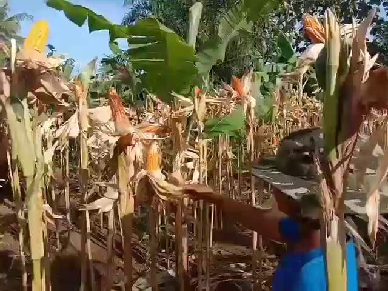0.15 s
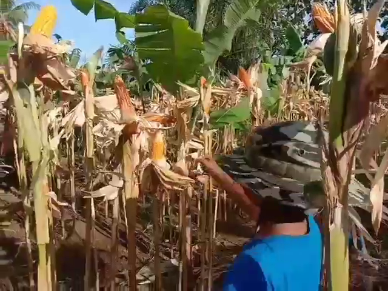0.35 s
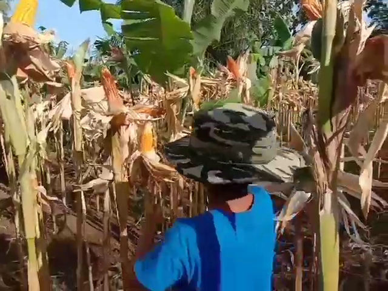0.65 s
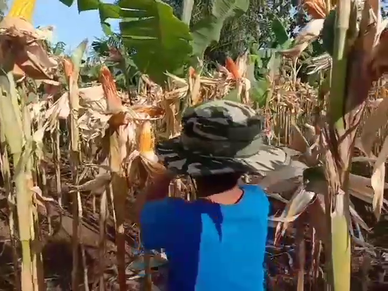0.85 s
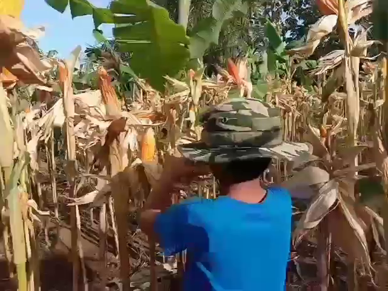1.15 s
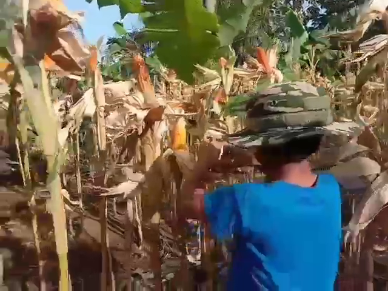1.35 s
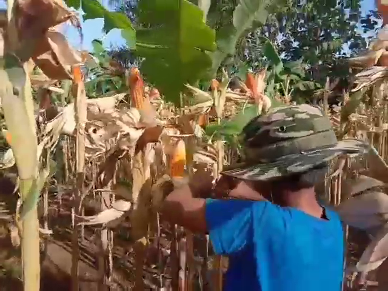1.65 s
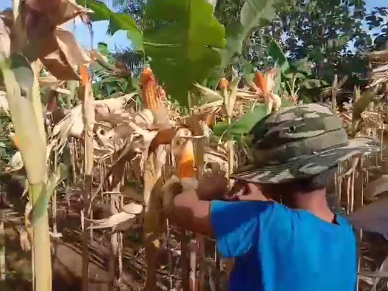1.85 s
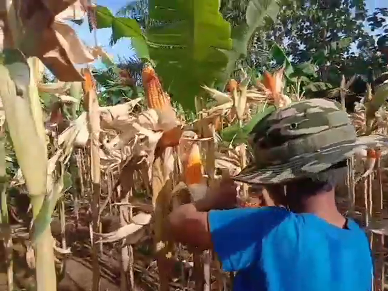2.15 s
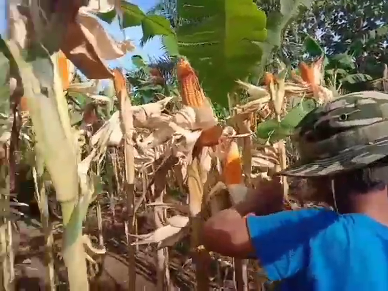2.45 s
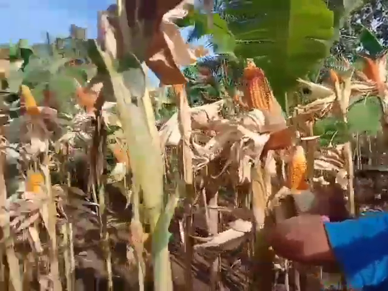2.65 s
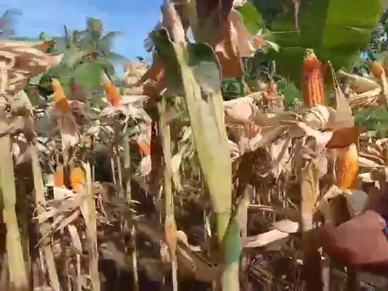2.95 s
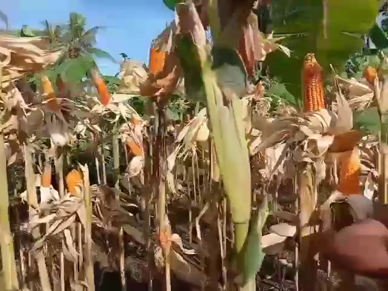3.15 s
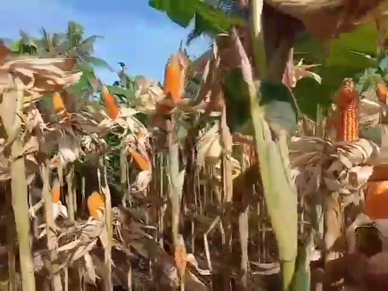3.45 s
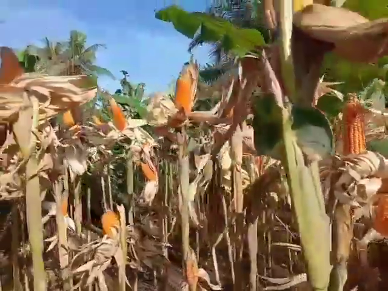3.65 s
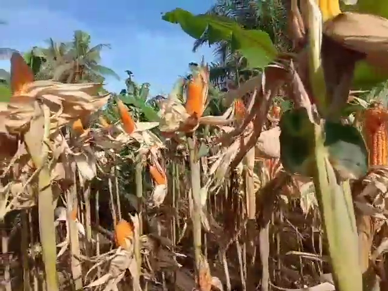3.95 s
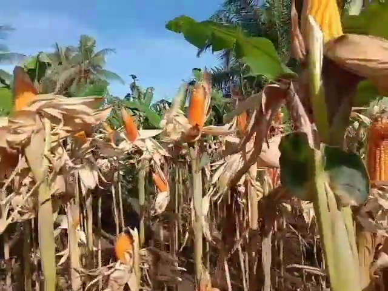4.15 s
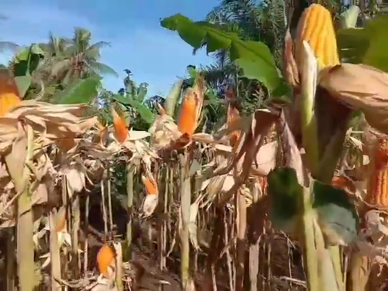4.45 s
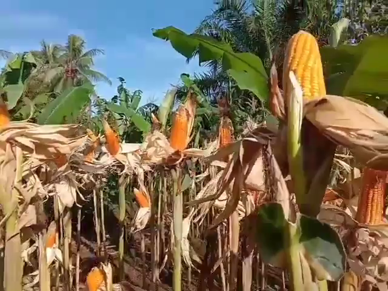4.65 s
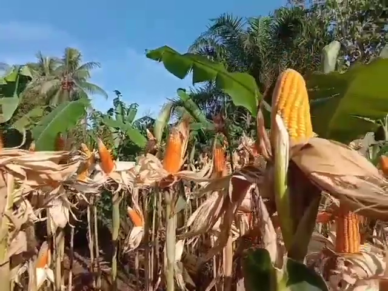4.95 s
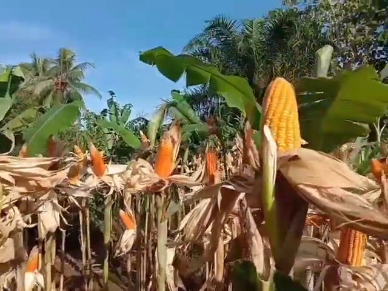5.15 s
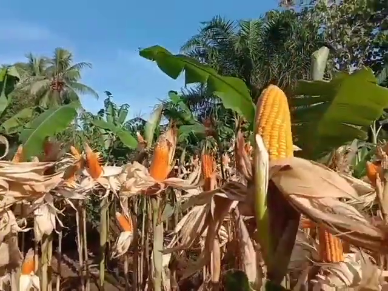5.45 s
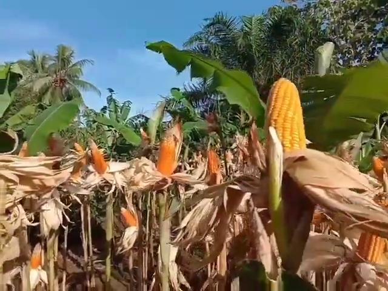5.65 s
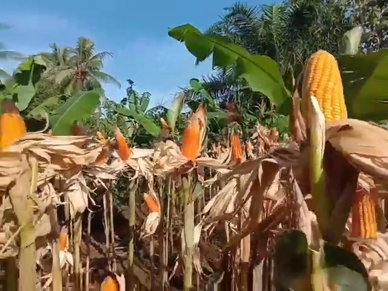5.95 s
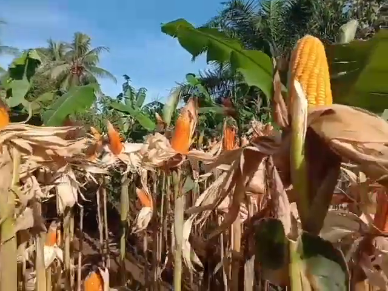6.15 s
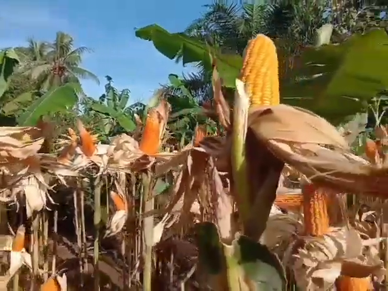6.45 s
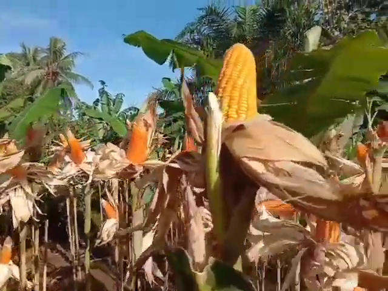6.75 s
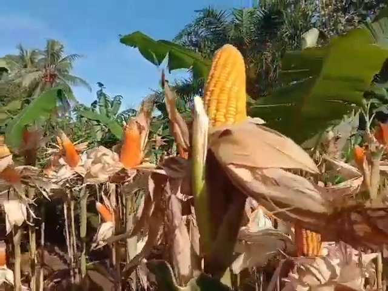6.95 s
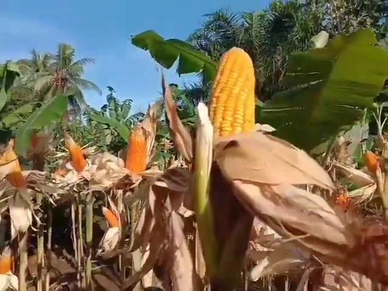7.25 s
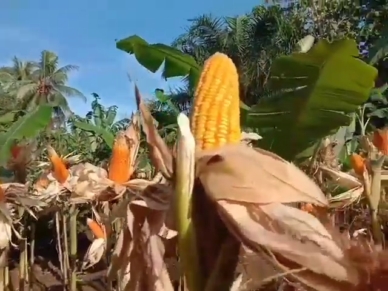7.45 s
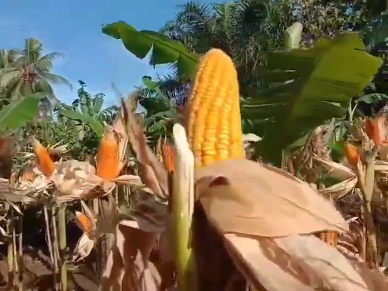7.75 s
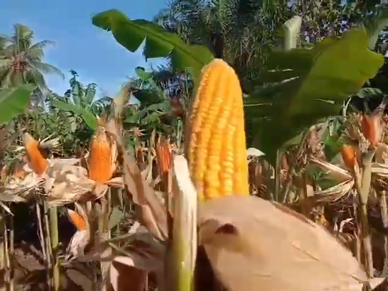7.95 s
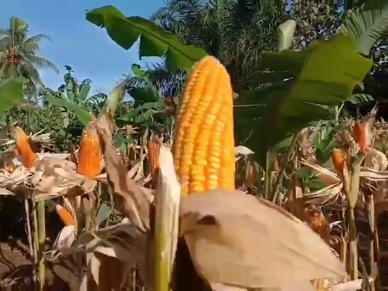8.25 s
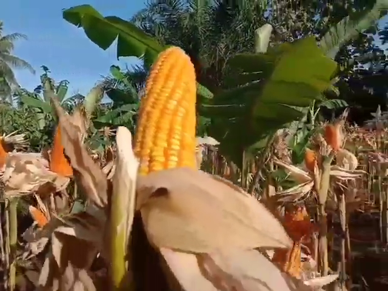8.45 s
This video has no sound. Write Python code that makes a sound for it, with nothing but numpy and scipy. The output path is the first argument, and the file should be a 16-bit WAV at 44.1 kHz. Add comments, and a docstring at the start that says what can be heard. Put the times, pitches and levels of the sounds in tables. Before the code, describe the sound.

Hands work dry corn close to the microphone: papery husks crinkle in short pulls, brittle fibres snap, and a few dull knocks land early on. Around three seconds a rooster some way off gives a hoarse crow, then a clearer falling note that echoes among trees. The crackling continues to the end, with stronger bursts near five and eight seconds, over a low outdoor rumble and faint hiss.

```python
"""Dry maize is picked by hand close by: noise under crack envelopes makes husks crinkle, and sharp bursts snap.
Dull bumps are short low resonances with a scuff. Shaped noise gives a low outdoor rumble and a faint hiss.
At first a faint distant hum, one unsteady sine, wavers. A rooster some way off, a roughened harmonic voice,
gives a hoarse three-note crow and then a clearer falling note, answered by echoes and the trees."""
import sys
import numpy as np
from scipy import signal
from scipy.fft import rfft, irfft, next_fast_len
from scipy.io import wavfile
from scipy.ndimage import uniform_filter1d, map_coordinates

SR = 44100
rng = np.random.default_rng(int(sys.argv[2]) if len(sys.argv) > 2 else 0)


def inscribe(sig):
    """Save sig as 16-bit PCM at rate SR to the path in sys.argv[1].

    A 1-D sig is mono; a 2-D sig holds one channel per row.
    Samples are clipped to [-1, 1] before scaling.
    """
    pcm = np.round(np.clip(np.atleast_2d(sig).T, -1, 1) * 32767)
    wavfile.write(sys.argv[1], SR, pcm.astype(np.int16))


N = 379260


def amp(db):
    """Decibels to gain."""
    return 10 ** (np.asarray(db) / 20)


def unit(x):
    """Scale to rms 1."""
    return x / np.sqrt(np.mean(x ** 2) + 1e-20)


def noise(count=N):
    """White Gaussian noise."""
    return rng.standard_normal(count)


def along(points, hz):
    """(Hz, value) points interpolated on a log frequency axis."""
    f, v = np.transpose(points)
    return np.interp(np.log(hz + 1), np.log(f + 1), v)


def curves(rows):
    """One value per sample for each column after the time."""
    s, *cols = np.transpose(rows)
    return [np.interp(np.arange(N) / SR, s, c) for c in cols]


def wobble(knots_per_s):
    """A smooth random curve through Gaussian knots."""
    knots = noise(int(N * knots_per_s / SR) + 4)
    return map_coordinates(knots, [np.arange(N) * knots_per_s / SR])


def phase_of(hz):
    """Phase in radians of a varying frequency."""
    return 2 * np.pi * np.cumsum(hz) / SR


def filtered(x, response):
    """x times a response of frequency."""
    m = next_fast_len(N + SR // 2)
    return irfft(rfft(x, m) * response(np.fft.rfftfreq(m, 1 / SR)), m)[..., :N]


def ring(level_at, size=4096):
    """Minimum-phase impulse response of a dB curve of frequency, by folding its cepstrum."""
    cepstrum = irfft(np.log(amp(level_at(np.fft.rfftfreq(size, 1 / SR)))))
    cepstrum[1:size // 2] *= 2
    cepstrum[size // 2 + 1:] = 0
    return irfft(np.exp(rfft(cepstrum)))


def through(x, spectrum):
    """x heard through a body with this spectrum, of unit energy."""
    response = ring(lambda hz: along(spectrum, hz))
    return signal.fftconvolve(x, response / np.linalg.norm(response))[:len(x)]


def add(track, s, sound):
    """Lay a sound into a track at time s in seconds."""
    part = track[round(s * SR):][:len(sound)]
    part += sound[:len(part)]


def cracks(per_s, spread_db, life_s):
    """Envelope of random fibre cracks of unequal size; the energy of each falls to 1/e in life_s."""
    size = amp(spread_db * np.clip(noise(), -2, 2.2))
    sizes = size * (rng.random(N) < per_s / SR)
    energy = signal.lfilter([1], [1, -np.exp(-1 / (life_s * SR))], sizes ** 2)
    return unit(np.sqrt(energy))


def dappled(x, depth_db, size=96):
    """Each piece of leaf has its own colour: the band balance drifts at random over time and frequency."""
    z = signal.stft(x, nperseg=size)[2]
    across_bands = uniform_filter1d(noise(z.shape), size=3, axis=0)
    field = uniform_filter1d(across_bands, size=9, axis=1)
    return signal.istft(z * amp(depth_db * unit(field)), nperseg=size)[1][:N]


# Pulls and pushes on the husks. Each row: start in seconds, length in seconds, place of the hardest
# pull 0-1, crisp crackle level in dB, papery body level in dB.
HUSK_STROKES = [(0.088, 0.023, 0.04, -41, -46), (0.286, 0.047, 0, -44.5, -47), (0.518, 0.072, 0, -50, -71),
                (0.61, 0.039, 1, -50.5, -55), (0.788, 0.11, 0.85, -46.5, -44), (0.888, 0.09, 1, -44, -55),
                (1.041, .14, .55, -41, -42.5), (1.278, .095, 1, -45, -49.5), (1.502, .12, 0.24, -41.5, -46),
                (1.631, 0.13, 0.37, -37.5, -47), (1.76, 0.11, 0.67, -35, -38.5),
                (1.909, 0.076, 0.8, -45, -51.5), (2.041, 0.12, 0.4, -49, -49),
                (2.174, 0.28, 0.95, -42.5, -49.5), (2.506, 0.12, 0.5, -36, -40.5),
                (2.642, 0.069, 0.04, -38.5, -39.5), (2.814, 0.33, 0.33, -46, -47.5),
                (3.056, 0.19, .6, -37, -42.5), (3.392, 0.23, 0.7, -39.5, -45.5),
                (3.654, 0.23, 0.83, -35, -43), (3.905, .11, 0.94, -44, -46),
                (4.095, 0.058, 0.61, -28.5, -44), (4.282, 0.13, 0.37, -35.5, -43.5),
                (4.381, 0.14, 1, -42.5, -50.5), (4.585, 0.2, .8, -35, -47), (4.862, .12, 0.16, -40, -48),
                (5.1, 0.21, 0.48, -25.5, -36.5), (5.303, 0.14, 0.38, -30.5, -37),
                (5.46, 0.18, 0, -41, -46.5), (5.711, 0.11, 0.3, -38.5, -50), (5.933, 0.24, 0.8, -35, -46.5),
                (6.193, 0.15, 0.07, -39.5, -50), (6.579, .08, 0.1, -41, -49), (6.683, 0.21, .8, -45, -52),
                (6.901, 0.15, 0.7, -38.5, -50.5), (7.152, 0.096, 0.3, -40.5, -47.5),
                (7.286, 0.1, 0.2, -38, -49), (7.363, 0.014, 0.6, -60, -35.5),
                (7.573, .055, 0.9, -45, -66.5), (7.695, 0.17, 0.7, -44, -74),
                (7.855, 0.14, 0.28, -25.5, -38.5), (7.962, 0.14, 0.2, -31.5, -37),
                (8.139, 0.087, 0.47, -30.5, -38.5), (8.251, 0.12, 0.36, -33, -44.5),
                (8.456, 0.16, 0.77, -40, -46)]
# Leaves stirring between strokes. Each row: time in seconds, crackle level in dB before the swing.
LEAF_STIRRING = [(0, -56.5), (.74, -67.5), (.95, -47.5), (2.4, -48.5), (2.78, -52.5), (3.3, -53.5),
                 (3.7, -44.5), (4.55, -47.5), (5.05, -47.5), (5.5, -44.5), (6.4, -44), (7.6, -46),
                 (8.6, -43)]
STIRRING_PAPER_DB, STIRRING_SWING_DB = -10, 2  # papery body re their crackle; unevenness
STROKE_ATTACK_S, STROKE_RELEASE_S = 0.033, 0.057  # from silence to the grip, and back
GRIP_DB, LET_GO_DB = -6, -6.5  # start and end of a stroke, re its hardest pull


def effort():
    """Gains of crackle and papery body: each stroke grips, builds to its hardest pull and lets go."""
    t = np.arange(N) / SR
    stirring_db = curves(LEAF_STIRRING)[0] + STIRRING_SWING_DB * wobble(14)
    crisp_power = amp(stirring_db) ** 2
    paper_power = amp(stirring_db + STIRRING_PAPER_DB) ** 2
    for s, length, crest, crisp_db, paper_db in HUSK_STROKES:
        u = t[:round((STROKE_ATTACK_S + length + STROKE_RELEASE_S) * SR)] - STROKE_ATTACK_S
        crest_s = length * np.clip(crest, .01, .99)
        pull = amp(np.interp(u, [0, crest_s, length], [GRIP_DB, 0, LET_GO_DB]))
        contact = np.interp(u, [-STROKE_ATTACK_S, 0, length, length + STROKE_RELEASE_S], [0, 1, 1, 0]) ** 2
        add(crisp_power, s - STROKE_ATTACK_S, (amp(crisp_db) * pull * contact) ** 2)
        add(paper_power, s - STROKE_ATTACK_S, (amp(paper_db) * pull * contact) ** 2)
    return np.sqrt(crisp_power), np.sqrt(paper_power)


# Spectrum of the crisp crackle. Each row: frequency in Hz, relative density in dB per Hz.
CRISP_SPECTRUM = [(900, -25.5), (2500, -46), (3600, -11.5), (4700, 0), (6000, 0.5), (7500, 2.5),
                  (8600, -11), (11000, -17), (14000, -26), (16000, -12.5)]
# Spectrum of the papery or hollow body. Each row: frequency in Hz, relative density in dB per Hz.
PAPER_SPECTRUM = [(100, -49), (300, -20.5), (600, -4), (1000, -4.5), (1600, 0.5), (2400, 3), (3500, 3.5),
                  (6000, -33.5), (12000, -28.5)]


def husks():
    """Crinkling husks: clumps of cracks over the hiss of leaf sliding on leaf."""
    crisp_gain, paper_gain = effort()
    fibres = cracks(per_s=500, spread_db=1.0, life_s=0.00024)
    folds = cracks(per_s=59, spread_db=2.0, life_s=0.0077)  # a fold gives way in one quick run

    def layer(spectrum, fold, own, slide, colour_db):
        """One voice of the leaves: shared cracks, cracks of its own and a steady slide."""
        single = cracks(per_s=140, spread_db=4.5, life_s=0.0012)
        power = fibres ** 2 + (fold * folds) ** 2 + (own * single) ** 2 + slide ** 2
        source = dappled(np.sqrt(power) * noise(), colour_db)
        return unit(through(source, spectrum))

    crisp = layer(CRISP_SPECTRUM, fold=1.0, own=0.17, slide=0.74, colour_db=2.0)
    paper = layer(PAPER_SPECTRUM, fold=0.75, own=0.7, slide=1.8, colour_db=3.0)
    paper = unit(dappled(paper, depth_db=2.5, size=512))  # broad leaves bend, their resonances shift
    return crisp_gain * crisp + paper_gain * paper


# Distant rumble level. Each row: time in seconds, level in dB before RUMBLE_TRIM_DB and the lumps.
RUMBLE_CURVE = [(0, -57), (1.3, -58), (1.8, -54), (2.5, -60), (4.9, -58.5), (5.65, -54.5), (6, -59),
                (6.6, -56), (7.4, -55.5), (7.8, -58), (8.15, -52), (8.6, -60)]
# Rumble spectrum. Each row: frequency in Hz, relative density in dB per Hz.
RUMBLE_SPECTRUM = [(20, -17), (42, -13), (62, -1), (100, 5.5), (170, -1.5), (300, -11.5), (500, -18),
                   (1200, -34), (3000, -24), (8000, -29.5), (15000, -50)]
# Hiss of the air and the microphone. Each row: frequency in Hz, relative density in dB per Hz.
HISS_SPECTRUM = [(200, -13), (1200, 21), (3000, -4), (5000, 5), (7400, 34.5), (9000, -30), (15000, -20)]
RUMBLE_TRIM_DB, WIND_LUMPS_DB, HISS_DB = 0.5, 2.6, -62.5


def rumble():
    """Low noise of the open air, with lumps of light wind, and a faint steady hiss."""
    level_db = curves(RUMBLE_CURVE)[0] + RUMBLE_TRIM_DB + WIND_LUMPS_DB * wobble(14)
    low = amp(level_db) * unit(through(noise(), RUMBLE_SPECTRUM))
    hiss = amp(HISS_DB) * unit(through(noise(), HISS_SPECTRUM))
    return low + hiss


STRAY_DB, STRAY_SCATTER_DB = 11, 5  # re the stroke's crackle level, before SNAP_TRIM_DB
STRAY_HOLLOW_DB = -12.5  # before HOLLOW_TRIM_DB
STRAY_LOW_HZ, STRAY_HIGH_HZ = 2400, 7300  # range of the ring


def stray_snaps():
    """One small fibre snaps at a chance moment of each stroke, with random strength and ring."""
    rows = []
    for (s, length, _, crisp_db, _), (when, force, pitch) in zip(HUSK_STROKES, rng.random((len(HUSK_STROKES), 3))):
        db = crisp_db + STRAY_DB + STRAY_SCATTER_DB * (2 * force - 1)
        ring_hz = STRAY_LOW_HZ + (STRAY_HIGH_HZ - STRAY_LOW_HZ) * pitch
        rows.append((s + when * length, db, STRAY_HOLLOW_DB, ring_hz))
    return rows


# Breaking ribs and stalks. Each row: time in seconds, level in dB before SNAP_TRIM_DB, hollow stalk
# share in dB before HOLLOW_TRIM_DB, ring in Hz.
RIB_SNAPS = [(0.0237, -29.5, -11, 4300), (0.0823, -19.5, -3, 4100), (0.779, -29, -2, 6100),
             (0.8298, -23, -4, 4570), (0.846, -20, -7, 4340), (0.8709, -19.5, -9, 6240),
             (1.4598, -20, -14, 2710), (1.648, -14, -30, 7100), (1.7174, -16, -24, 2630),
             (1.7718, -19, -28, 4700), (2.3495, -20, -34, 5900), (2.4262, -17.5, -44, 6750),
             (2.5015, -8, -19, 5250), (2.54, -9, -38, 5800), (2.553, -5.5, -23, 6550),
             (2.914, -12, -15, 4400), (3.7487, -15.5, -29, 6900), (3.7804, -16, -23, 5150),
             (3.8827, -15, -9, 6304), (4.083, -8.5, -15, 6050), (4.1454, -11.5, -23, 6400),
             (4.4451, -19, -11.5, 5750), (5.0618, -16.5, -20.5, 5830), (5.0914, -24, -33, 7100),
             (5.2332, -9, -18, 5030), (5.3354, -9, -7.5, 5260), (5.371, -9.5, -5, 4570),
             (5.444, -13, -36, 4960), (5.693, -21, -18, 5660), (6.125, -12.5, -30, 7100),
             (6.4755, -18, -23, 4970), (6.517, -19, -20, 5400), (6.542, -15.5, -16, 6400),
             (6.5758, -17.5, -15, 6200), (6.9672, -20, -26, 4980), (7.0407, -16, -6.5, 4800),
             (7.2937, -20.5, -18, 5680), (7.423, -19, -26, 5530), (7.857, -6.5, -18.5, 5300),
             (7.9055, -16, -30, 5370), (7.9325, -10.5, -11.5, 4600), (8.108, -10.5, -11.5, 5500),
             (8.1886, -12.5, -13, 4840), (8.533, -15.5, -11.5, 7100), (8.546, -8.5, -15.5, 7100)]
# Spectrum of a snapping rib, fuller than the crinkle. Each row: frequency in Hz, relative dB per Hz.
RIB_SPECTRUM = [(600, -38.5), (1500, -14), (2700, -1), (4500, 0.5), (6000, -1.5), (7500, 1), (9000, -15),
                (12000, -19.5), (16000, -25)]
SNAP_TRIM_DB, HOLLOW_TRIM_DB = -25.5, 4.5
SNAP_LEAD_S = .004  # strain before the break


def snaps():
    """A rib breaks: fibres strain, a quick run of cracks rings at the leaf's own pitch, the leaf shivers."""
    out = np.zeros(N)
    t = np.arange(SR // 12) / SR - SNAP_LEAD_S
    crack = amp(np.interp(t, [-SNAP_LEAD_S, -.0006, 0, .002, .014, .03], [-26, -8, 0, -3, -50, -120]))
    shiver = .16 * (t > 0) * amp(-60 * abs(t) / .08)
    for s, db, hollow_db, ring_hz in RIB_SNAPS + stray_snaps():
        burst = (crack + shiver) * rng.choice([-1, 1], len(t))
        leaf = ring(lambda hz: along(RIB_SPECTRUM, hz) + 9 * np.exp(-((hz - ring_hz) / 600) ** 2))
        crisp = unit(signal.fftconvolve(burst, leaf)[:len(t)])
        hollow = unit(through(burst, PAPER_SPECTRUM))
        sound = crisp + amp(hollow_db + HOLLOW_TRIM_DB) * hollow
        add(out, s - SNAP_LEAD_S, amp(db + SNAP_TRIM_DB) * sound)
    return out


# Dull knocks of the handling. Each row: time in seconds, level in dB before BUMP_TRIM_DB,
# main resonance in Hz.
HANDLING_BUMPS = [(0.084, -51, 644), (0.867, -44.5, 440), (1.125, -44.5, 517), (1.159, -44, 600),
                  (1.773, -28, 252), (1.817, -27.5, 262), (1.84, -34, 654), (1.862, -35, 560),
                  (1.88, -34.5, 251), (1.906, -40.5, 261), (2.643, -57, 436)]
# Spectrum of the scuff. Each row: frequency in Hz, relative density in dB per Hz.
SCUFF_SPECTRUM = [(30, -31), (100, -9), (260, -3), (400, -10), (580, -1), (900, -16.5), (1300, -16.5),
                  (2500, -42), (6000, -73)]
BUMP_TRIM_DB = -16.5
BUMP_RISE_S, SCUFF_T60_S, BODY_T60_S = 0.0031, 0.071, 0.023


def bumps():
    """Soft contacts give low knocks, each with one short resonance and a brief scuff."""
    out = np.zeros(N)
    t = np.arange(SR // 8) / SR
    rise = 1 - np.exp(-t / BUMP_RISE_S)
    for s, db, ring_hz in HANDLING_BUMPS:
        scuff = unit(through(rise * amp(-60 * t / SCUFF_T60_S) * noise(len(t)), SCUFF_SPECTRUM))
        body = unit(rise * amp(-60 * t / BODY_T60_S) * np.sin(2 * np.pi * ring_hz * t))
        add(out, s, amp(db + BUMP_TRIM_DB) * (scuff + 0.93 * body))
    return out


# Far hum. Each row: time in seconds, pitch in Hz before the waver, peak level in dB before the swell.
HUM_CURVE = [(.3, 308, -82), (.5, 305, -64.5), (.8, 327.3, -69.5), (1.2, 316, -67.5), (1.65, 323, -65),
             (1.9, 320, -95)]


def hum():
    """A faint low tone far away: a sine with random waver of pitch and swell of level."""
    pitch_hz, level_db = curves(HUM_CURVE)
    waver = 1 + .04 * wobble(12) + .03 * wobble(60)
    swell_db = 4 * wobble(16)
    return amp(level_db + swell_db) * np.sin(phase_of(pitch_hz * waver))


# Rooster notes; the first two rows are one note that breaks upward. Each row: start in seconds, hold in
# seconds, release in seconds, pitch in Hz, final pitch in Hz, scoop from below 0-1, roughness 0-1,
# fundamental level in dB, octave level in dB.
CROW_NOTES = [(2.966, 0.029, 0.13, 752, 775, 0.05, 0.13, -53, -37),
              (3.028, 0.084, 0.12, 890, 799, 0.07, 0.58, -48, -46),
              (3.24, 0.13, .1, 899.4, 887.4, .27, 0.67, -42, -44.5),
              (3.434, .25, .08, 875, 957, .24, 0.88, -46.5, -42),
              (3.975, 0.15, .17, 904, 659, 0.05, 0.33, -47, -40.5)]
NOTE_ATTACK_S, SCOOP_S = 0.023, 0.021  # the voice opens, and slides up to its pitch
NOTE_RELEASE_DB = 33  # lost during the release
FUNDAMENTAL_RELEASE = 0.31  # share of that loss: the fundamental dies more slowly than the octave
THINNING_DB = 5  # lost by the fundamental during the hold
GLIDE_BEND = 1.9  # exponent: the glide gathers speed
ONSET_ROUGH = .8  # share of the roughness at the start; it grows with the strain


def crow_notes():
    """Pitch, roughness and gains of fundamental and octave: each note scoops up, holds, glides and fades."""
    pitch_hz, rough = np.full(N, 800.), np.zeros(N)
    first_gain, octave_gain = np.zeros(N), np.zeros(N)
    for s, hold, release, hz, final_hz, scoop, roughness, first_db, octave_db in CROW_NOTES:
        t = np.arange(round((hold + release) * SR)) / SR
        start = round(s * SR)
        span = slice(start, start + len(t))
        strain = np.minimum(t / hold, 1)
        fade_db = NOTE_RELEASE_DB * np.maximum(t - hold, 0) / release
        gate = np.clip(np.minimum(t, t[-1] - t) / NOTE_ATTACK_S, 0, 1)
        glide_hz = hz + (final_hz - hz) * (t / t[-1]) ** GLIDE_BEND
        pitch_hz[span] = glide_hz * (1 - scoop * np.exp(-t / SCOOP_S))
        rough[span] = roughness * (ONSET_ROUGH + (1 - ONSET_ROUGH) * strain)
        first_gain[span] += gate * amp(first_db - THINNING_DB * strain - FUNDAMENTAL_RELEASE * fade_db)
        octave_gain[span] += gate * amp(octave_db - fade_db)
    return pitch_hz, np.clip(rough, 0, 1), first_gain, octave_gain


# Crow overtones above the octave. Each row: multiple of the fundamental, level in dB re the octave.
CROW_OVERTONES = [(3, -27), (4, -14)]


def rooster():
    """The syrinx buzzes on one pitch; where the bird strains, a second flutter and chaos split the lines."""
    pitch_hz, rough, first_gain, octave_gain = crow_notes()
    flutter = np.sin(phase_of(68 + 12 * wobble(25)))  # about 68 Hz
    strain_jitter = .015 * wobble(60) + .018 * wobble(260) + .045 * flutter
    jitter = .004 * wobble(50) + rough * strain_jitter
    phase = phase_of(pitch_hz * (1 + jitter))

    def strength():
        """Roughness trades a harmonic's steady strength for a rasp with wide skirts."""
        rasp = .8 * flutter + .75 * wobble(220) + .4 * wobble(800)
        return np.sqrt(2) * (np.sqrt(1 - rough ** 2) + rough * rasp)

    slip = .9 * rough * wobble(320)  # radians
    first = strength() * np.sin(phase + slip)
    overtones = sum(amp(db) * np.sin(k * phase) for k, db in CROW_OVERTONES)
    upper = strength() * (np.sin(2 * phase) + overtones)
    return first_gain * first + octave_gain * upper


def echoed(x, echoes):
    """x with its delayed copies."""
    return x + sum(amp(db) * np.pad(x, (round(delay * SR), 0))[:N] for delay, db in echoes)


# Decay among the trees. Each row: frequency in Hz, 60 dB decay time in seconds.
TREE_DECAY = [(300, 0.18), (1500, 0.58), (6000, 0.42)]


def trees(x):
    """The diffuse answer of the trees round the field: decaying noise, 20 ms late."""
    hz, t, z = signal.stft(noise(SR // 2), SR, nperseg=256)
    decay = amp(-60 * t / along(TREE_DECAY, hz)[:, None])
    tail = signal.istft(z * decay, SR, nperseg=256)[1]
    return signal.fftconvolve(np.pad(x, (SR // 50, 0)), tail / np.linalg.norm(tail))[:N]


# Top of the crackle as the hands face the microphone. Each row: time in seconds, gain in dB.
FACING_CURVE = [(0, 1), (.7, -7.5), (1.2, 1.5), (2.4, 1), (3.3, 1), (4.1, 1), (5.5, -4), (6.8, -1),
                (7.8, -3), (8.5, -2)]
# Cracks sent back by the ground and nearby stalks. Each row: delay in seconds, level in dB.
NEARBY_ECHOES = [(.0042, -29), (.0093, -15.5), (0.0129, -19)]
# The crow sent back by the edge of the wood. Each row: delay in seconds, level in dB.
WOOD_ECHOES = [(.031, -8.5), (.067, -10), (.112, -28)]


def scene():
    """The leaves are close and dry, the crow comes with echoes; both channels carry the same sound."""
    leaves = husks() + snaps()
    top = filtered(leaves, lambda hz: 1 - 1 / (1 + (hz / 9500) ** 8))
    top_gain = amp(curves(FACING_CURVE)[0])
    near = echoed(leaves + (top_gain - 1) * top, NEARBY_ECHOES) + bumps()
    crow = echoed(rooster(), WOOD_ECHOES)
    wet = amp(-21) * trees(near) + amp(-8) * trees(crow)
    mid = near + crow + wet + rumble() + hum()
    return np.array([mid, mid])


# Microphone port resonances and notches. Each row: centre in Hz, width in Hz, gain in dB.
PORT_RESONANCES = [(1243.5, 74, 11.5), (3260, 580, -10), (6585, 174, -5.5), (6670, 110, -3),
                   (14770, 640, 13.5)]
TOP_HZ = 15750  # band limit


def record(dry):
    """The microphone port colours the sound; nothing passes above the band limit."""
    port = ring(lambda hz: sum(db * np.exp(-((hz - centre) / width) ** 2)
                               for centre, width, db in PORT_RESONANCES))
    coloured = signal.fftconvolve(dry, port[None], axes=1)[:, :N]
    return filtered(coloured, lambda hz: hz < TOP_HZ)


dry = scene()
out = record(dry)
inscribe(out)
```